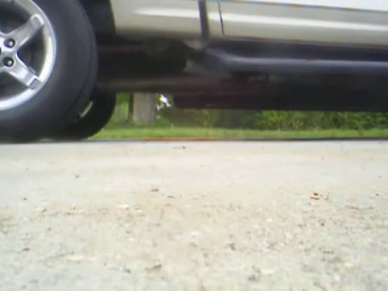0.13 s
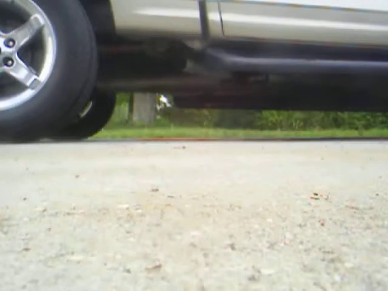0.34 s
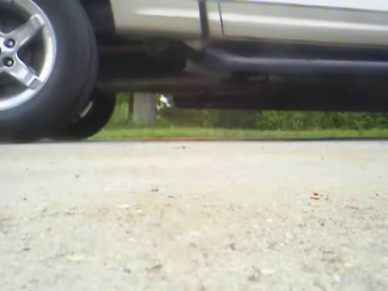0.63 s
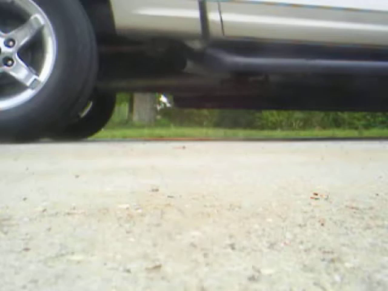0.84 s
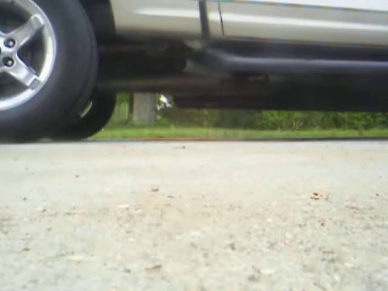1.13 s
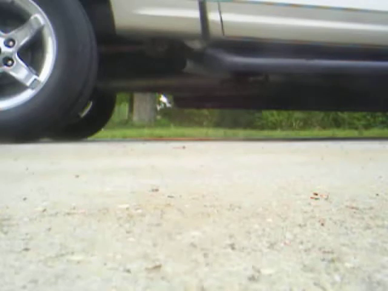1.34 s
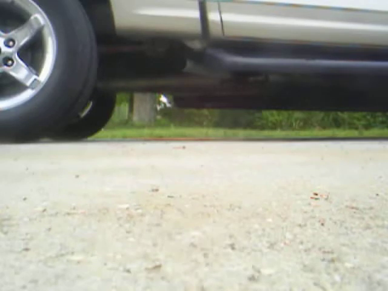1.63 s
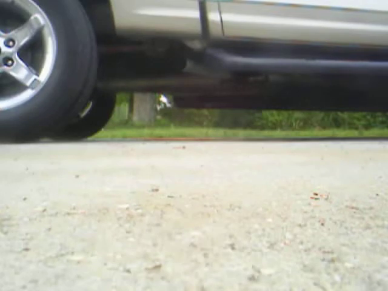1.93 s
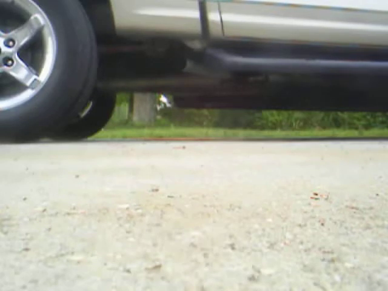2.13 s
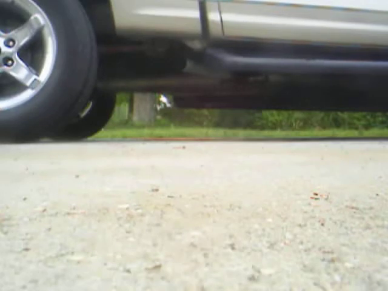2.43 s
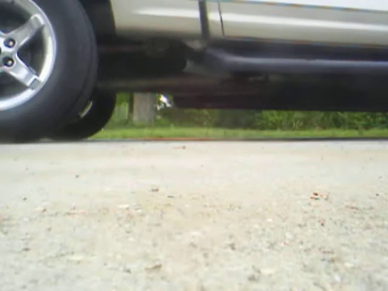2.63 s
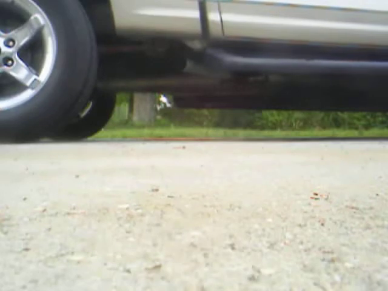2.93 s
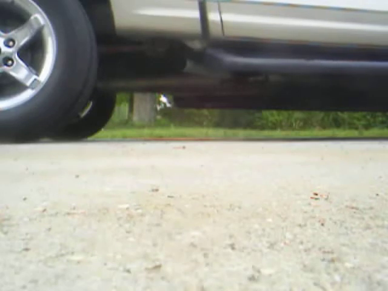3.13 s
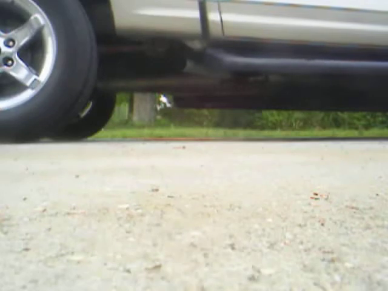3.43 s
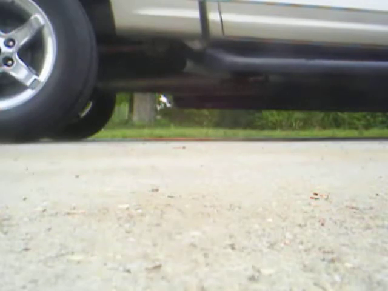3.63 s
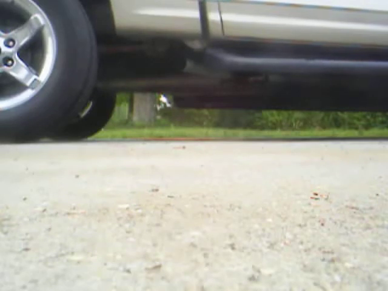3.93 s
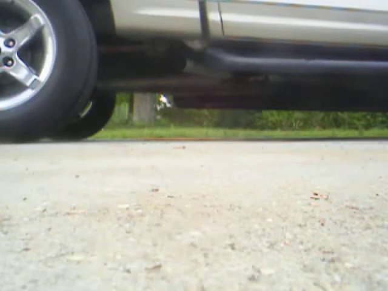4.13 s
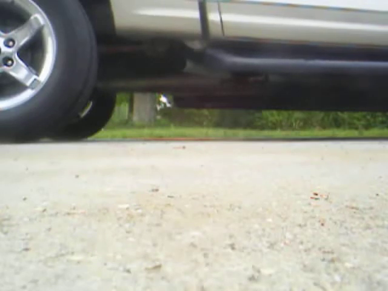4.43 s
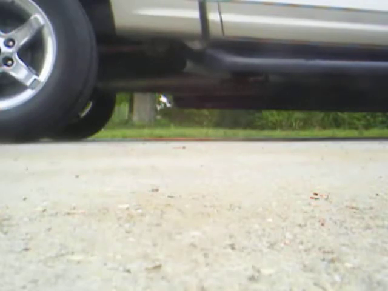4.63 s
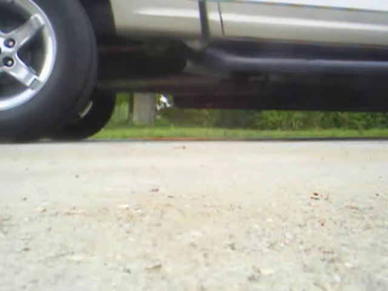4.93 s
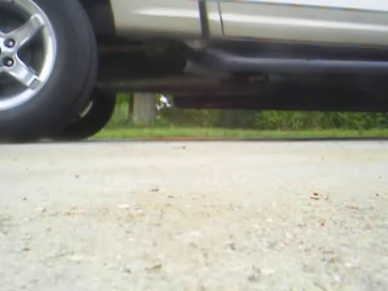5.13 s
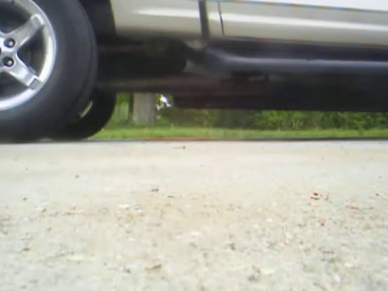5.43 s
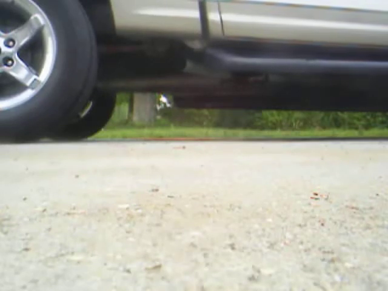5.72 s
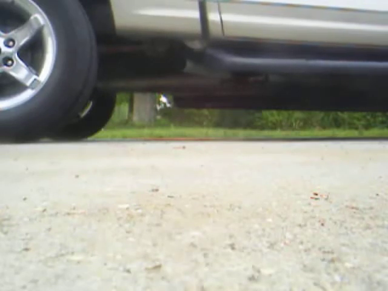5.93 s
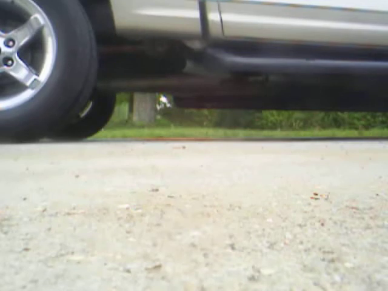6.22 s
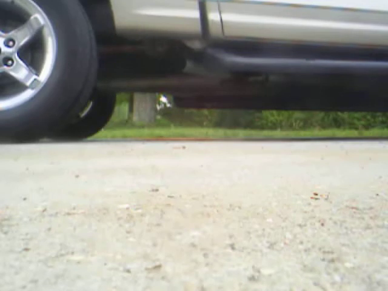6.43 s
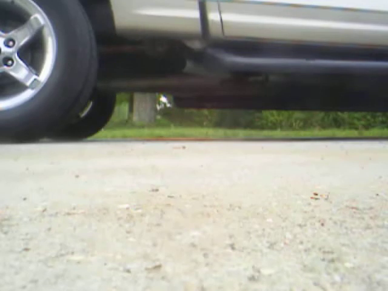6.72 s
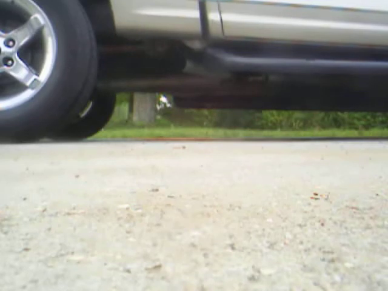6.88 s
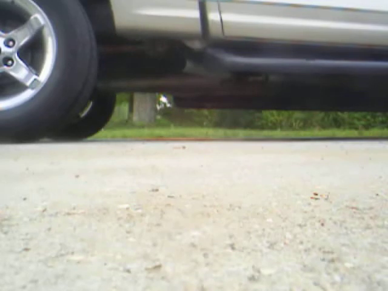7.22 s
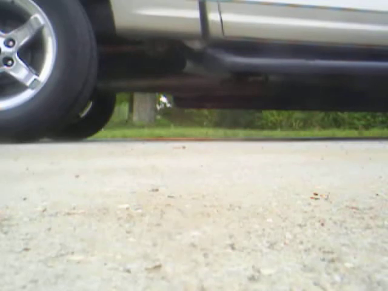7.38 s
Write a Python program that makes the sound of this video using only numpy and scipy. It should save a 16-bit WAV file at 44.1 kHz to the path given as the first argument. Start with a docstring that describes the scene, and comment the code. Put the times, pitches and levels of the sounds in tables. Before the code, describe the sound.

Very loud, overloaded close capture of a throaty V8 truck engine: quick throttle stabs, then longer roaring revs with burbling run-downs and sharp pops.

```python
"""A V8 pickup with an open exhaust, standing on gravel, is blipped and then revved hard.
The microphone lies on the ground close by, in a camera with a narrow audio band.
Each firing sends a pulse and a puff of turbulent gas down the pipes: raspy under throttle, a lumpy
throb on the overrun. Gas blowing along the ground rumbles at the microphone. Pops and hard single
firings come at listed moments, many near a stab of throttle; overloads make the gain control duck."""
import sys
import numpy as np
from scipy import signal
from scipy.fft import rfft, irfft, next_fast_len
from scipy.io import wavfile
from scipy.ndimage import uniform_filter1d, minimum_filter1d, map_coordinates

SR = 44100
rng = np.random.default_rng(int(sys.argv[2]) if len(sys.argv) > 2 else 0)


def inscribe(sig):
    """Save sig as 16-bit PCM at rate SR to the path in sys.argv[1].

    A 1-D sig is mono; a 2-D sig holds one channel per row.
    Samples are clipped to [-1, 1] before scaling.
    """
    pcm = np.round(np.clip(np.atleast_2d(sig).T, -1, 1) * 32767)
    wavfile.write(sys.argv[1], SR, pcm.astype(np.int16))


N = 332955
TIME = np.arange(N) / SR


def amp(db):
    """Decibels to an amplitude factor."""
    return 10 ** (np.asarray(db) / 20)


def smooth(x, seconds):
    """A triangular running mean, from two passes of a flat one."""
    width = max(1, int(seconds * SR))
    return uniform_filter1d(uniform_filter1d(x, width), width)


def steady(x):
    """x at a running rms of 1, keeping its fast throbs."""
    power = np.abs(smooth(x * x, 0.068))
    return x / np.sqrt(power + 1e-14)


def wobble(rate):
    """A smooth random curve, rate knots a second."""
    knots = rng.standard_normal(int(N * rate / SR) + 4)
    return map_coordinates(knots, [TIME * rate])


def filtered(x, gain, causal=True):
    """x through a gain of frequency; the causal form rings only after each pulse."""
    m = 2 * next_fast_len(N // 2 + 8192)
    response = gain(np.fft.rfftfreq(m, 1 / SR))
    if causal:  # minimum phase, by folding the cepstrum
        cepstrum = irfft(np.log(np.maximum(response, 1e-6)))
        cepstrum[1:m // 2] *= 2
        cepstrum[m // 2 + 1:] = 0
        response = np.exp(rfft(cepstrum))
    return irfft(rfft(x, m) * response, m)[..., :N]


def band(x, lo_hz, hi_hz, order=6):
    """The part of x between two frequencies."""
    def gain(hz):
        low_side = 1 + (lo_hz / (hz + 1e-3)) ** (2 * order)
        high_side = 1 + (hz / hi_hz) ** (2 * order)
        return (low_side * high_side) ** -.5
    return filtered(x, gain, causal=False)


def lookup(rows, at):
    """Each later column of a table, read where its first column equals at."""
    key, *cols = np.transpose(rows)
    return np.array([np.interp(at, key, c) for c in cols])


# pedal presses: down t/s, easing from t/s, up t/s, depth [0-1], depth left on afterwards [0-1],
# note level/dB, rasp level/dB, level/dB of the coast after it
PEDAL_PRESSES = [(.18, 0.328, .425, .455, 0.02, 2, 1.5, 0), (1.085, 1.2, 1.27, 0.43, .07, 2, -2, -2),
                 (1.346, 1.455, 1.545, 0.33, 0.01, 1, 2, -0.5),
                 (1.784, 2.003, 2.085, .505, 0.03, -0.5, -1, 1),
                 (2.699, 3.208, 3.41, .593, .044, 0.5, 1.5, 1), (4.122, 4.419, 4.734, .779, .13, -1, -1, 0),
                 (5.642, 5.914, 6.21, 0.94, 0.19, -0.5, -1.5, -0.5), (7.242, 7.55, 7.44, 1, 0, -0.5, 1, 7)]
PRESS_S, FIRST_DEPTH = .088, .093  # time to push the pedal down; its depth before the first press


def throttle():
    """Pedal depth: pushed down quickly, held, eased off."""
    points, before = [(0, FIRST_DEPTH)], FIRST_DEPTH
    for down, easing, up, depth, after, *_ in PEDAL_PRESSES:
        points += [(down, before), (down + PRESS_S, depth), (easing, depth), (up, after)]
        before = after
    return lookup(points, TIME)[0]


START_RATE, HIGH_RATE = 52, 220  # firings a second: at the start, and at top revs
PULL_RATE_PER_S, DRAG_PER_S = 537.6, 1.038  # firing rate gained per second at full pedal; friction
FULL_EFFORT_RATE_PER_S = 347  # run-up at which the cylinders burn hardest
STARVED_DEPTH, LOAD_SPAN = .22, .16  # depth that starves it at top revs; this much more pulls evenly


def crankshaft():
    """Pedal against friction sets firing rate, load (0 coasting, 1 pulling) and effort 0-1."""
    pedal = throttle()
    drive = PULL_RATE_PER_S * pedal
    run_down = START_RATE * np.exp(-DRAG_PER_S * TIME)
    rate = run_down + signal.lfilter([1 / SR], [1, -np.exp(-DRAG_PER_S / SR)], drive)
    load = np.clip((pedal - STARVED_DEPTH * rate / HIGH_RATE) / LOAD_SPAN, 0, 1)
    effort = np.clip((drive - DRAG_PER_S * rate) / FULL_EFFORT_RATE_PER_S, 0, 1)
    return rate, load, effort


# cylinders in firing order: pipe length [0 near bank - 1 far bank], strength on the overrun level/dB
FIRING_ORDER = [(0.15, 3), (1, 1.5), (0.99, 12), (0.12, 4.5), (0.75, 7.5), (0.11, -8), (0.1, 2), (0.98, -2)]


def firings(cycle, fast, load, far_db=-3, far_lag=.0009, scatter_db=1.8, overrun_scatter_db=0.5,
            lope_db=2, jitter=.00005, overrun_jitter=0.00029, lope_jitter=0.00052):
    """One pulse per cylinder; the far bank comes later and weaker, idle and overrun burn unevenly."""
    n = np.arange(1, int(cycle[-1] * 8))
    s = np.interp(n / 8, cycle, TIME)
    far, uneven_db = np.array(FIRING_ORDER)[n % len(FIRING_ORDER)].T
    starved, lope, pull = (np.interp(s, TIME, c) for c in ((1 - load) * fast, 1 - fast, load))
    size, shift = rng.standard_normal((len(n), 2)).T
    db = far * far_db * (1 + pull) / 2 + starved * uneven_db  # the far bank loses half as much coasting
    spread_db = scatter_db * (1 - 0.14 * pull * (1 - lope))
    spread_db += starved * overrun_scatter_db + lope * (1 - pull) * lope_db
    db += size * spread_db
    s = s + far * far_lag + shift * (jitter + starved * overrun_jitter + lope ** 2 * lope_jitter)
    return np.bincount(np.clip(s * SR, 0, N - 1).astype(int), amp(db), N)


def jets(pulses, rate, life=0.52, spit_db=2.0):
    """Each pulse drags a jet of its own strength, dying over a share (life) of the firing interval."""
    latest = np.maximum.accumulate(np.arange(N) * (pulses > 0))
    strength = pulses * amp(spit_db * rng.standard_normal(N))
    decay = np.exp(-(TIME - TIME[latest]) * rate / life)
    return smooth(strength[latest] * decay, 0.0014)


# resonances of the pipes and the underbody: f/Hz, width f/Hz, lift level/dB
PIPE_RESONANCES = [(114.2, 58, 10), (214.8, 63, 6.5), (228.9, 19, 8), (325, 30, 15), (397.5, 58, 10),
                   (472.4, 18, 12), (541.8, 81, 12), (652, 73, 5.5), (801.4, 13, 8.5), (868, 14, 7),
                   (1005, 37, 7.5), (1139, 220, 4.5), (1504, 98, 4.5), (1727, 16, 4), (2078, 17, 7.5)]
# slope of the exhaust under those peaks: f/Hz, level/dB
PIPE_SLOPE = [(20, -48.5), (45, 2), (75, -3), (110, 10.5), (200, -2.5), (300, -12), (500, -15.5),
              (1200, -19.5), (2000, -21.5), (3500, -25.5), (4400, -34.5)]


def pipe(hz):
    """Gain of the exhaust: a falling slope with standing-wave peaks."""
    f, db = np.transpose(PIPE_SLOPE)
    peaks_db = sum(lift / (1 + (2 * (hz - centre) / width) ** 2) for centre, width, lift in PIPE_RESONANCES)
    return amp(np.interp(np.log(hz + 1), np.log(f), db) + peaks_db)


# exhaust while coasting: rate [firings/s], then boom, bark, rasp, hiss level/dB
COASTING_LEVELS = [(42, -23, -33, -33.5, -34.5), (51.5, -21.5, -35.5, -33.5, -37), (65, -21, -30, -35, -40),
                   (81, -18, -27, -32.5, -42), (108, -16.5, -24, -29, -37), (134, -16.5, -23, -29, -38.5),
                   (170, -16.5, -21, -27.5, -35), (220, -18.5, -17, -28, -36.5)]
# exhaust while pulling: rate [firings/s], then boom, bark, rasp, hiss level/dB
PULLING_LEVELS = [(50, -20.5, -26.5, -26, -34), (65, -19, -23, -25.5, -34.5),
                  (83.33, -18.5, -22.5, -21, -29), (133, -18.5, -21, -23, -31.5),
                  (158, -20.5, -17, -22.5, -32.5), (204, -28.5, -20.5, -20.5, -31.5)]
# rise from no effort to full effort: boom, bark, rasp, hiss level/dB
EFFORT_RISE = (-5.5, -2.5, 9.5, 12.5)
USUAL_EFFORT = 0.67  # the effort that adds no rise or fall to the pulling levels


def exhaust_levels(rate, load, effort):
    """Note, boom, bark, rasp and hiss in dB: speed and load set them, effort brightens the sound."""
    presses = np.array(PEDAL_PRESSES)
    latest = np.maximum(np.searchsorted(presses[:, 0], TIME) - 1, 0)
    note_db, rasp_db, coast_db = smooth(presses[latest, -3:].T, 0.036)
    pulling = lookup(PULLING_LEVELS, rate) + np.outer(EFFORT_RISE, effort - USUAL_EFFORT)
    pulling[2:] += rasp_db  # rasp and hiss
    coasting = lookup(COASTING_LEVELS, rate) + coast_db
    return note_db, *(load * pulling + (1 - load) * coasting)


def engine_order(x, cycle, order):
    """The line of x at a multiple of the cycle rate."""
    turn = np.exp(2j * np.pi * order * cycle)
    return 2 * (smooth(x / turn, .06) * turn).real


# strength of an engine order as it sweeps through the pipe's resonances: f/Hz, level/dB
ORDER_SWEEP = [(40, -44.5), (50, -39), (58, -32), (72, -25), (84, -24), (95, -13.5), (108, -10.5),
               (122, -13), (137, -13.5), (152, -16), (180, -18.5), (197, -12.5), (222, -10), (238, -14),
               (275, -22), (325, -19), (440, -21.5)]


def low_orders(thud, cycle, rate, load, fast, note_db, note_pull_db=0.5, octave_db=-8.5,
               beat_db=-7.0, beat_pull_db=-.5, sub_db=-33):
    """The firing note and its kin, lifted by the pipe; gives them and the thud without them."""
    # order 8 is the firing note and 16 its octave; uneven turns of the two banks give orders 5 and 3
    note, octave, beat, sub = (engine_order(thud, cycle, order=k) for k in (8, 16, 5, 3))
    note_sweep_db, octave_sweep_db, beat_sweep_db = (lookup(ORDER_SWEEP, rate * k / 8)[0] for k in (8, 16, 5))
    rest = thud - note - octave - beat - sub
    tones = amp(note_sweep_db + note_db + note_pull_db * load) * steady(note)
    tones += amp(octave_sweep_db + octave_db + 4.1 * load * (1 - fast)) * steady(octave)
    tones += amp(beat_sweep_db + beat_db + beat_pull_db * load) * steady(beat)
    tones += amp(sub_db - 9.7 * load - 16 * (0.5 - fast)) * steady(sub)
    return tones, rest


def engine():
    """Pulses and gas puffs ring the pipes; the low engine orders carry the note."""
    rate, load, effort = crankshaft()
    note_db, boom_db, bark_db, rasp_db, hiss_db = exhaust_levels(rate, load, effort)
    fast = np.clip((rate - 55) / 70, 0, 1)  # 0 at idle, 1 at high revs
    idle = (1 - load) * (1 - fast)
    uneven_rate = rate * (1 + (.0015 + .02 * idle) * wobble(25))
    cycle = np.cumsum(uneven_rate) / SR / len(FIRING_ORDER)
    pulses = firings(cycle, fast, load)
    puffs = jets(pulses, rate) * rng.standard_normal(N)
    sources = [steady(pulses), steady(puffs), rng.standard_normal(N)]
    thud, puff, flow = filtered(np.array(sources), pipe)
    tones, thud = low_orders(thud, cycle, rate, load, fast, note_db)
    tones += overtones(cycle, rate, load)

    body = band(thud + (.55 - 0.43 * fast) * puff, 45, 270)
    racing = np.clip((rate - 150) / 60, 0, 1)  # the deepest throb thins out at top revs
    boom = amp(boom_db) * steady(body - racing * band(body, 5, 108, order=4))

    bark_puff = (.4 - 0.12 * load * fast) * puff
    bark_flow = (0.65 + .5 * idle) * (1 - .6 * load) * flow
    bark = amp(bark_db) * steady(band(thud + bark_puff + bark_flow, 230.6, 716))

    # under throttle the treble comes in sharp spits; coasting leaves a smooth rush
    spit = (0.26 * thud + puff) * (1 - 0.47 * idle)
    rasp = amp(rasp_db) * steady(band(spit + (1.15 - 1.02 * load) * flow, 687, 2097))
    rush = steady(band(spit + (1.4 - 1.37 * load) * flow, 2580, 9200))
    hiss = amp(hiss_db) * steady(rush + 0.51 * idle * idle_air(rate))
    return tones + boom + bark + rasp + hiss


def idle_air(rate, base_hz=2450, rise_hz=19, width_hz=260):
    """Narrow noise on a carrier: a whistling hiss at idle that sinks as the engine slows."""
    phase = 2 * np.pi * np.cumsum(base_hz + rise_hz * rate) / SR
    return steady(band(rng.standard_normal(N), 5, width_hz, order=2) * np.cos(phase))


def buffet(level_db=-42):
    """Exhaust gas blowing along the ground rumbles at the microphone."""
    rumble = steady(band(rng.standard_normal(N), 16, 30, order=2))
    return amp(level_db + 5.0 * wobble(16)) * rumble


# pops and hard single firings: t/s, pressure push level/dB, crack level/dB, centre of the crack f/Hz
POPS_AND_HARD_FIRINGS = [(.002, 0, -11.5, 1250), (0.214, -13, -21.5, 1490), (.249, -13, -20.5, 1380),
                         (0.407, -1.5, -14, 1188), (1.058, 6, -16.5, 788), (1.171, -14.5, -25.5, 1814),
                         (1.208, -14, -21, 592), (1.357, -11.5, -22, 1300), (1.373, -3, -15.5, 1185),
                         (1.487, -12.5, -18.5, 548), (1.5, -16.5, -19, 1000), (1.751, -5.5, -17.5, 900),
                         (1.767, 11, 0, 1187), (1.997, -11, -18, 1690), (2.032, -9.5, -10, 550),
                         (2.7202, 3.5, -4, 1180), (2.944, -0.5, -10, 2200), (4.114, 27.5, -9, 1000),
                         (4.928, -8, -16, 900), (5.269, -10, -22, 1020)]


def pops_and_hard_firings(push_hz=125, push_life=0.0068, crack_life=0.0058, spread=1.43):
    """A swing of pressure with a crack of band-limited noise on top, at each listed moment."""
    t = np.arange(SR // 20) / SR
    push = np.sin(2 * np.pi * push_hz * t) * np.exp(-(t / push_life) ** 6)
    burst = np.exp(-(t / crack_life) ** 4)
    out = np.zeros(N + len(t))
    for s, push_db, crack_db, hz in POPS_AND_HARD_FIRINGS:
        edges = np.clip([hz / spread, hz * spread], 100, 8000)
        crack_band = signal.butter(2, edges, "band", fs=SR, output="sos")
        crack = burst * signal.sosfilt(crack_band, rng.standard_normal(len(t)))
        crack *= np.linalg.norm(burst) / np.linalg.norm(crack)  # the burst's energy, before its level
        out[max(0, round(s * SR)):][:len(t)] += amp(push_db) * push + amp(crack_db) * crack
    return out[:N]


# upper orders that sing out at high revs: order [multiple of the cycle rate], level/dB
UPPER_ORDERS = [(9, -22), (13, -24), (18, -28), (20, -33), (24, -35)]


def overtones(cycle, rate, load, waver_db=1.0, coast_db=-9, growth=1.5):
    """Even burning at high revs brings out clean upper orders, stronger under load."""
    lines = 0
    for order, db in UPPER_ORDERS:
        tone = np.sin(2 * np.pi * (round(order) * cycle + rng.random()))
        lines = lines + amp(db + waver_db * wobble(14)) * tone
    return np.sqrt(2) * lines * amp(coast_db * (0.5 - load)) * (rate / HIGH_RATE) ** growth


HELD_LOW_UNTIL_S, HELD_LOW_DB = .19, -12.5  # the sound of engine and rumble is held low at first


def scene():
    """Engine and ground rumble, their sound held low for the first moments, with pops and hard firings."""
    opening = amp(HELD_LOW_DB * smooth(1. * (TIME < HELD_LOW_UNTIL_S), 0.0068))
    return (opening * (engine() + buffet()) + pops_and_hard_firings())[None]


GAIN_LAG_S, GAIN_ATTACK_S = .0022, .005  # the gain control reacts this late and this gradually


def gain_control(x, limit_db=1, hold=0.042, release_db=215, deepest_db=26, overreaction=1.207):
    """Overloads pull the gain down after a short lag; it holds, then climbs release_db a second."""
    over_db = overreaction * np.maximum(20 * np.log10(np.abs(x) + 1e-9) - limit_db, 0)
    width = 2 * int(hold * SR / 2) + 1
    held = -minimum_filter1d(-over_db, width, origin=width // 2)
    released = np.maximum.accumulate(held + release_db * TIME) - release_db * TIME
    cut_db = smooth(np.minimum(released, deepest_db), GAIN_ATTACK_S)
    return x * amp(-np.interp(TIME - GAIN_LAG_S, TIME, cut_db, left=0))


BAND_HZ, TOP_HZ = 4047, 15800  # the camera's audio bandwidth, far below its storage limit


def record(dry, ceiling=0.78, offset=-.038):
    """Gain control, saturating preamplifier, narrow band, and a converter that sits off zero and clips."""
    x = gain_control(dry[0])
    x = x / (1 + np.abs(x / ceiling) ** 8) ** (1 / 8)
    x = np.clip(band(x, 10, BAND_HZ, order=26) + offset, -.72, .72)
    return filtered(x, lambda hz: 1. * (hz < TOP_HZ), causal=False)[None]


dry = scene()
out = record(dry)
inscribe(out)
```